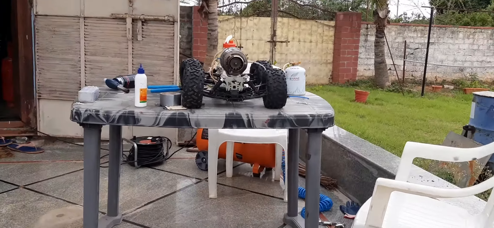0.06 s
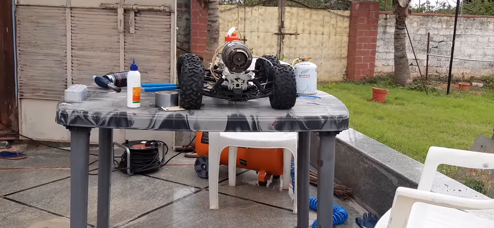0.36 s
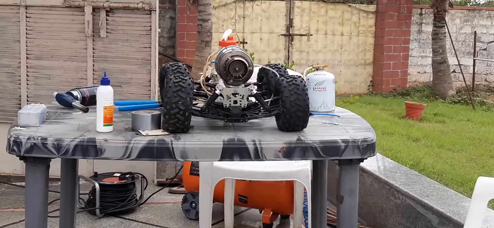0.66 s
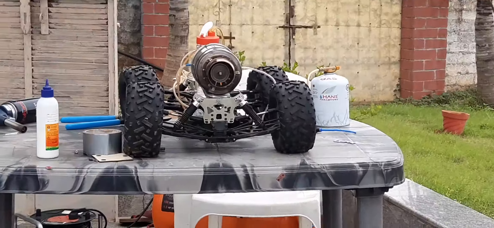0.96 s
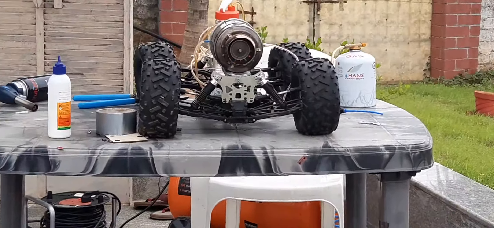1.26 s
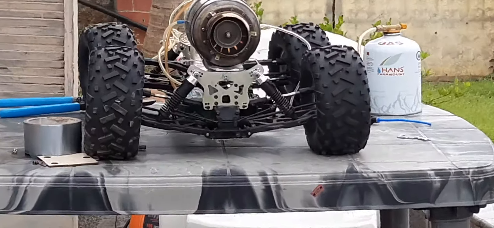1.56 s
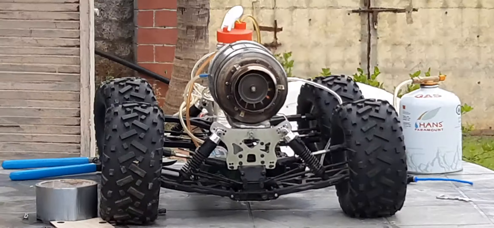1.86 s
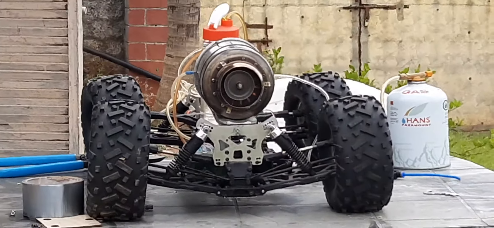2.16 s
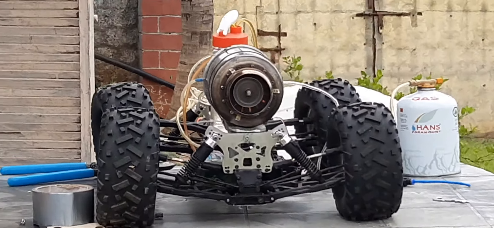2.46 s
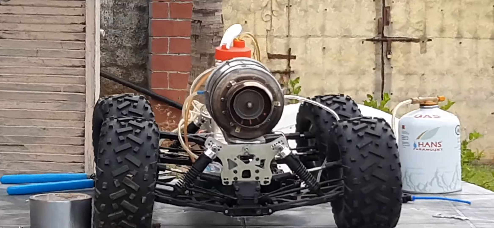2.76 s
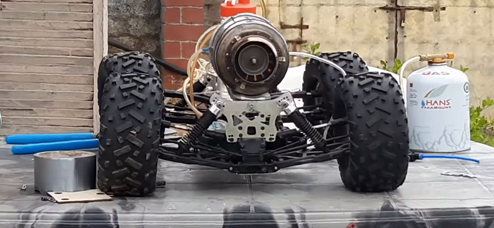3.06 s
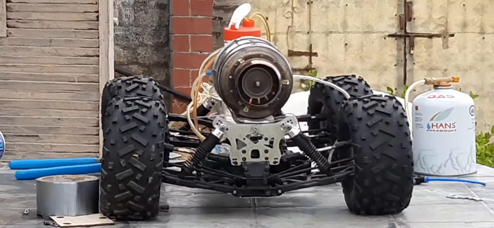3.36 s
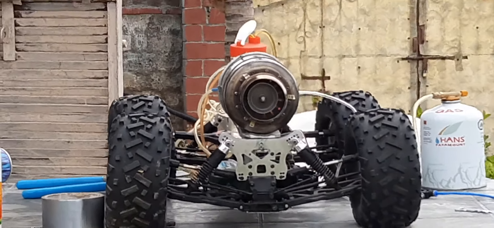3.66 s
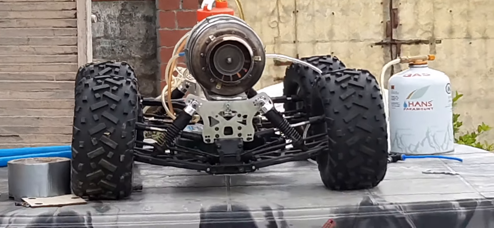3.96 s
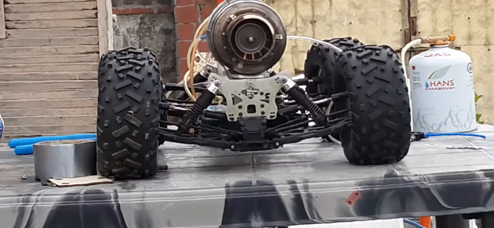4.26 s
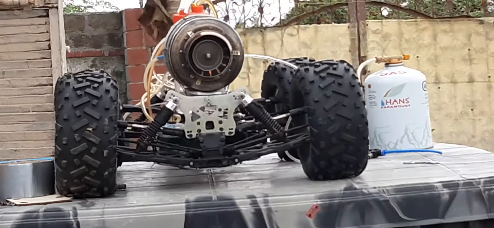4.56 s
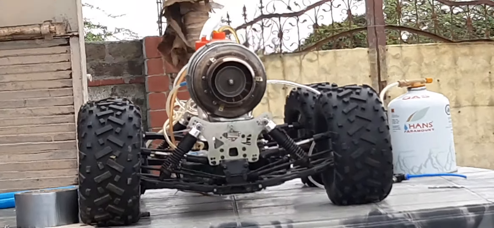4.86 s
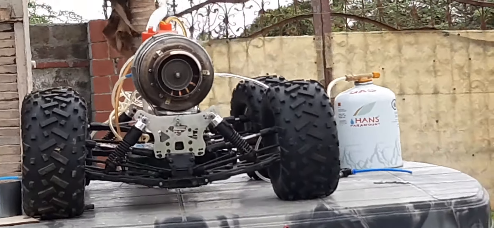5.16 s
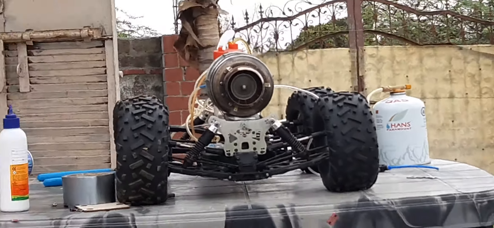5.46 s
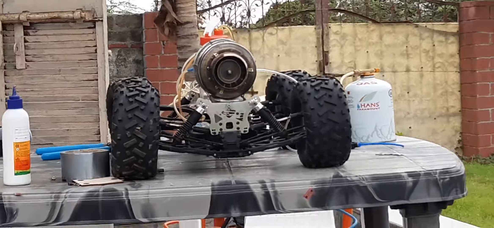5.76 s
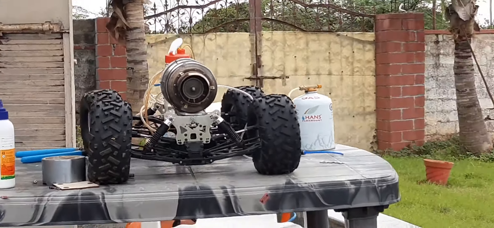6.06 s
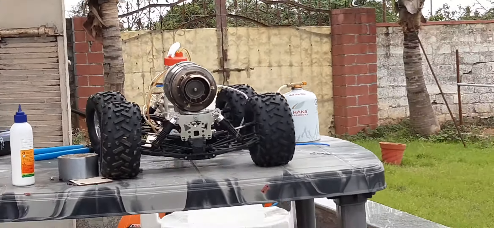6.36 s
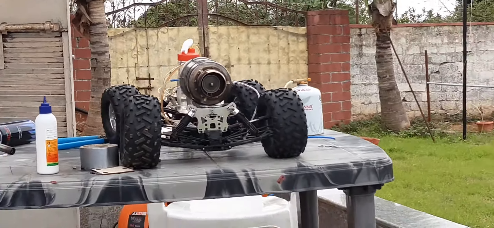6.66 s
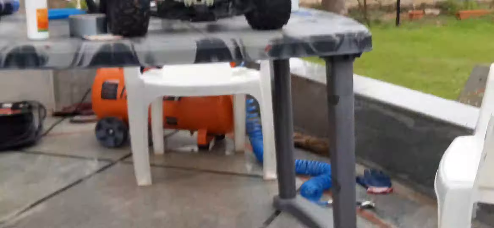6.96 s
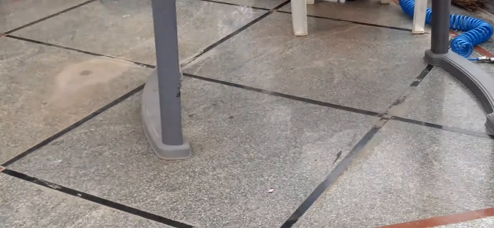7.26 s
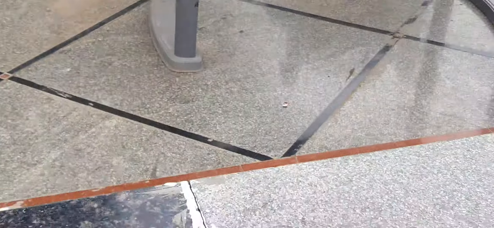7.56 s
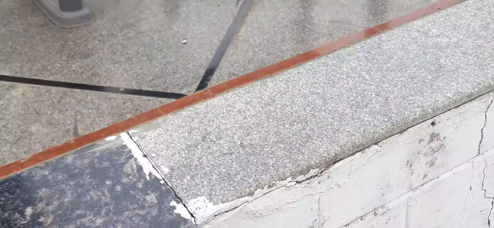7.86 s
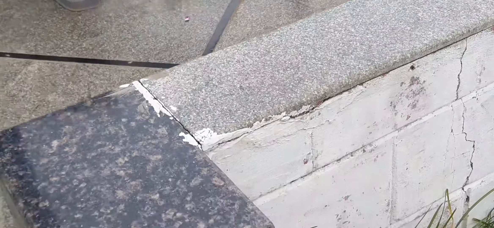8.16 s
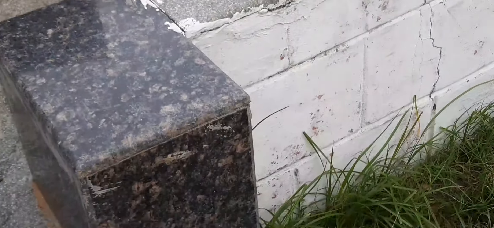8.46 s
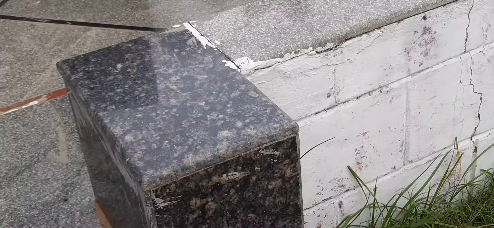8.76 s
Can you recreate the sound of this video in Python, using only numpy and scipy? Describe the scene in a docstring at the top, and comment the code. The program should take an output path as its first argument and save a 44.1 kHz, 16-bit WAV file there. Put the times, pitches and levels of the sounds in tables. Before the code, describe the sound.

Steady rushing roar and sharp hiss of a model jet engine, its thin whine creeping upward, with gusts thumping on the microphone.

```python
"""A small turbojet on a model car runs on a garden table and slowly speeds up. Turbulent combustion
roars, the jet hisses as it shears against still air, and thin shaft and bearing whines rise with the
rotor. The engine radiates a different spectrum each way, so its colour changes as a hand-held phone
comes close, stays level with it, then points down at the paving beside it. The yard adds weak
reflections, and while the phone is close, moving air buffets its two microphones."""
import sys
import numpy as np
from scipy import signal
from scipy.fft import rfft, irfft, next_fast_len
from scipy.io import wavfile
from scipy.ndimage import uniform_filter1d, minimum_filter1d, map_coordinates

SR = 44100
rng = np.random.default_rng(int(sys.argv[2]) if len(sys.argv) > 2 else 0)


def digitize_waveform(pressure):
    """Quantize a signal to 16-bit integers and store it at the path in sys.argv[1].

    Rows of a 2-D input are taken as channels; values are limited to [-1, 1].
    """
    field = np.atleast_2d(pressure).T
    bounded = np.clip(field, -1, 1)
    quanta = np.round(bounded * 32767).astype(np.int16)
    wavfile.write(sys.argv[1], SR, quanta)


N = 388080


def amp(db):
    """Amplitude ratio of a level in decibels."""
    return 10 ** (np.asarray(db) / 20)

def unit(x):
    """Normalisation to an rms of 1."""
    return x / np.sqrt(np.mean(x ** 2) + 1e-20)

def along(points, hz):
    """Interpolation of (Hz, value) points on a logarithmic frequency axis."""
    knots_hz, values = np.transpose(points)
    return np.interp(np.log(hz + 1), np.log(knots_hz + 1), values)

def curves(rows):
    """Linear interpolation in time: one value per sample for each column after the first."""
    times, *columns = np.transpose(rows)
    return [np.interp(np.arange(N) / SR, times, column) for column in columns]

def wobble(rate):
    """Smooth random fluctuation: a spline through `rate` Gaussian knots a second."""
    knots = rng.standard_normal(int(N * rate / SR) + 4)
    return map_coordinates(knots, [np.arange(N) * rate / SR])

def filtered(x, response):
    """Linear filtering: the spectrum is multiplied by a frequency response."""
    size = next_fast_len(N + SR // 4)
    return irfft(rfft(x, size) * response(np.fft.rfftfreq(size, 1 / SR)), size)[..., :N]


# Eddy pressure on a microphone. Each row: frequency in Hz, relative spectral level in dB.
BUFFET_SPECTRUM = [(15, -22), (30, -20), (60, -1.5), (105, 1.5), (180, -0.5), (290, 0), (500, -11),
                   (720, -19), (1000, -31), (2000, -48), (5000, -70)]
# Gusts. Each row: start of the hold in seconds, its length in seconds, relative level in dB.
WIND_GUSTS = [(0.64, 0.073, -22), (0.868, 0.13, -26.5), (1.094, 0.27, -26), (1.69, 0.069, -28),
              (1.895, 0.15, -26.5), (2.23, 0.13, -32), (3.214, 0.045, -25), (3.302, 0.16, -26.5),
              (3.485, 0.37, -25.5), (3.9, 0.09, -28), (4.023, 0.17, -25), (4.26, 0.21, -25),
              (4.553, 0.06, -26), (4.84, 0.098, -25), (5.014, 0.22, -26.5), (5.323, 0.122, -28),
              (5.504, 0.35, -29), (5.967, 0.051, -38), (6.345, 0.13, -26), (6.484, 0.12, -26),
              (6.828, 0.091, -26)]
# The draught, strongest near the engine. Each row: time in seconds, level in dB.
DRAUGHT_LEVEL = [(0, -67), (.5, -39), (.7, -36), (3, -34), (3.7, -34), (6.1, -29.5), (7, -34), (7.4, -55),
                 (8.8, -67)]

def wind(gust_db=-2.0, rise_s=0.037, fall_s=0.051, lump_db=3.5, shared=0.27, air_speed=0.93):
    """Turbulent pressure: eddies in gusts and a draught strike each microphone almost independently."""
    t = np.arange(N) / SR
    gusts = 0
    for start, length, db in WIND_GUSTS:
        corners = [start - rise_s, start, start + length, start + length + fall_s]
        gusts += amp(db + gust_db) * np.interp(t, corners, [0, 1, 1, 0])
    draught_db, = curves(DRAUGHT_LEVEL)
    strength = np.hypot(gusts, amp(draught_db))  # powers add
    air = rng.standard_normal((2, N)) + shared * rng.standard_normal(N)
    rumble = unit(filtered(air, lambda hz: amp(along(BUFFET_SPECTRUM, hz / air_speed))))
    lumps = unit(amp(lump_db * np.array([wobble(30), wobble(30)])))
    return rumble * strength * lumps


# Single harder puffs. Each row: time of the crest in seconds, relative level in dB,
# half length in seconds, air speed as a multiple of the usual.
AIR_PUFFS = [(0.897, -19, .009, 0.92), (1.108, -21, 0.011, .65), (1.279, -21, .014, 0.72),
             (1.342, -21, .009, 1), (1.759, -24, .007, 1.1), (1.85, -26, .006, 1), (1.898, -21, .008, 1.3),
             (1.956, -17.5, 0.01, 1.3), (1.993, -18.5, .007, 1.2), (2.262, -19, 0.0055, 1.2),
             (2.299, -19, .007, 1), (3.352, -18, .008, 1.2), (3.497, -21, .011, 1.14),
             (3.534, -22, .01, 1.1), (3.565, -22, .006, 1.3), (3.587, -18, .01, 0.87),
             (3.631, -21, .014, 1), (3.667, -20, .005, 1), (3.694, -17, 0.014, 1.06), (3.731, -20, .009, 1),
             (3.767, -19, .006, 0.64), (3.801, -22, .006, 1.2), (3.915, -19, 0.0085, 1.05),
             (3.973, -19.5, 0.0089, 1.5), (4.044, -20.5, .018, 1.7), (4.075, -18, .008, 1),
             (4.148, -18.5, .006, .9), (4.175, -22, .009, 1.14), (4.204, -17, .006, 1.16),
             (4.295, -16, 0.018, 1.2), (4.314, -19, .005, 1.4), (4.358, -14.5, 0.0067, 1.1),
             (4.402, -22, 0.0093, 0.89), (4.553, -21, .016, 1.5), (4.638, -20.5, 0.0071, 1.5),
             (4.871, -13, 0.0092, 1.07), (4.934, -20, .005, 1), (4.959, -18, 0.0041, 1.7),
             (4.974, -10.5, 0.0052, 1.3), (5.025, -15, 0.0073, 1.33), (5.246, -19, 0.017, .9),
             (5.341, -17.5, 0.011, 1), (5.386, -14.5, 0.0045, 1.5), (5.407, -18, .009, 1.5),
             (5.426, -14, .004, 0.72), (5.536, -16, 0.0063, 1), (5.551, -19, 0.0033, 1.2),
             (5.603, -22, .008, 1.1), (5.64, -19, .007, 1.4), (5.66, -20, 0.011, 1.06),
             (5.707, -15, .006, 0.85), (5.719, -11.5, 0.011, 2), (5.796, -14, 0.0092, 1.12),
             (5.807, -18, 0.0058, 1.1), (5.819, -14, .005, .9), (5.884, -19, .01, 1.2),
             (5.918, -18, 0.0044, 0.99), (5.98, -17, .007, 1.4), (6.149, -17.5, .004, 1.25),
             (6.21, -15.5, 0.0075, 1.4), (6.585, -21, .01, 0.84)]

def puffs(gain_db=1.8, shared=0.49, size=8192):
    """Eddy frequency scales with flow speed: a slow puff thumps, a fast one rips."""
    t = (np.arange(size) - size // 2) / SR
    hz = np.fft.rfftfreq(size, 1 / SR)
    out = np.zeros((2, N))
    for crest_s, db, half_s, air_speed in AIR_PUFFS:
        noise = rng.standard_normal((3, size))
        air = noise[:2] + shared * noise[2]
        swell = np.exp(-(t / half_s) ** 2)
        eddies = swell * irfft(rfft(air) * amp(along(BUFFET_SPECTRUM, hz / air_speed)))
        start = round(crest_s * SR) - size // 2
        out[:, start:start + size] += amp(db + gain_db) * unit(eddies) * np.sqrt(np.mean(swell ** 2))
    return out


def yard_reflections(x, count=10, echo_db=-14, sway_s=0.00022, mic_offset_s=0.0001954):
    """Comb filtering: table, paving and walls add weak copies whose delays drift as the phone moves."""
    n = np.arange(N)
    bright = filtered(x, lambda hz: hz ** 2 / (hz ** 2 + 850 ** 2))  # long waves bend round surfaces
    out = x.copy()
    for delay_s, slant in zip(rng.uniform(.003, .024, count), rng.uniform(-1.076, 1, count)):
        path_s = delay_s + sway_s * wobble(1.2)
        for mic, side in enumerate((-1, 1)):
            arrival_s = path_s + side * slant * mic_offset_s
            out[mic] += amp(echo_db) * np.interp(n - SR * arrival_s, n, bright[mic])
    return out


# Likeness of the engine's sound at the two microphones. Each row: frequency in Hz, coherence, 0 to 1.
MIC_COHERENCE = [(150, 0.9), (400, 0.7), (800, 0.9), (1100, 0.95), (1400, 0.72), (1800, 0.56), (2600, 0.58),
                 (4200, 0.56), (8000, 0.25), (14000, 0.5)]
# Level difference. Each row: frequency in Hz, left minus right in dB.
MIC_BALANCE = [(300, -0.5), (1100, 1), (2200, 0.5), (4500, -2.2), (6000, -0.94), (13000, -1.7)]
# Sound reaches the left microphone first. Each row: frequency in Hz, phase lead in radians.
MIC_PHASE_LEAD = [(0, -0.5), (1050, 0.77), (1650, 2), (2100, 5), (3000, 6.5), (4000, 10), (7100, 18.5),
                  (16000, 45)]

def engine_noise(colour_db, above_hz):
    """Partial coherence: noise at two spaced microphones, normalised by its power above `above_hz`."""
    size = next_fast_len(N)
    hz = np.fft.rfftfreq(size, 1 / SR)
    left, independent = rfft(rng.standard_normal((2, size)))
    coherence = np.clip(along(MIC_COHERENCE, hz), 0, 1)
    lag = np.exp(-1j * np.interp(hz, *np.transpose(MIC_PHASE_LEAD)))
    right = lag * (coherence * left + np.sqrt(1 - coherence ** 2) * independent)
    gain = amp(colour_db(hz))
    gain /= np.sqrt(np.mean(gain ** 2 * (hz > above_hz)))
    balance = amp(along(MIC_BALANCE, hz) * np.array([[.5], [-.5]]))
    return irfft(np.array([left, right]) * gain * balance, size)[:, :N]


# The phone's path. Each row: time in seconds, place (0 above the engine, 1 level with it,
# 2 down at the side, 3 over the garden wall).
PHONE_PLACE = [(0, 0), (3, 0), (4.02, 0.33), (4.35, 1), (6.1, 1), (6.7, 1.2), (7.3, 2), (7.9, 2),
               (8.12, 2.5), (8.5, 3.5), (8.8, 3)]

def directional_noise(spectra, resonances, above_hz):
    """Directivity: each place receives its own spectrum, blended at equal power as the phone moves."""
    place = np.clip(curves(PHONE_PLACE)[0], 0, len(spectra) - 1)
    out = 0
    for k, spectrum in enumerate(spectra):
        def colour_db(hz):
            peaks_db = sum(lift_db[k] * np.exp(-((hz - centre) / width) ** 2)
                           for centre, width, *lift_db in resonances)
            return along(spectrum, hz) + peaks_db
        share = np.clip(1 - abs(place - k), 0, 1)
        out += np.sqrt(share) * engine_noise(colour_db, above_hz)
    return out

def fading_tone(hz, width_hz, steady=0):
    """Scattering by eddies: a steady part plus a random part that differs at each microphone."""
    fading = np.array([steady + wobble(width_hz) + 1j * wobble(width_hz) for _ in range(2)])
    lead = np.interp(hz, *np.transpose(MIC_PHASE_LEAD)) * np.array([[1], [0]])
    phase = lead + 2 * np.pi * np.cumsum(hz) / SR
    return unit(np.real(fading * np.exp(1j * phase)))


# Rotor speed. Each row: time in seconds, turns per second.
SHAFT_SPEED = [(0, 1343), (.5, 1344), (1.1, 1341), (1.5, 1348), (2, 1358), (3, 1383), (4, 1409),
               (4.8, 1416), (6, 1448), (7.1, 1474), (7.7, 1479), (8.4, 1477), (8.8, 1483)]
# Shaft harmonics. Each row: multiple of shaft speed, width in Hz, relative dB at places 0 to 3.
SHAFT_HARMONICS = [(4, 30, -22, -24, -23, -29), (6, 22, -35, -32, -33, -31), (10, 18, -34, -33, -31, -26.5)]
# The phone crosses the bearing's narrow beams. Each row: time in seconds, relative level in dB.
BEARING_LEVEL = [(0, -26), (1, -35), (1.7, -24), (2.3, -26.5), (3.4, -27), (4.5, -21.5), (5.1, -27),
                 (6.3, -22), (6.9, -23), (7.4, -17.5), (7.8, -18), (8.2, -29), (8.8, -28)]
# A breathy whistle, loudest on the engine's axis. Each row: time in seconds, relative level in dB.
WHISTLE_LEVEL = [(0, -34), (2, -38), (3, -15), (4.3, -9.5), (4.65, -10), (4.85, -17), (5.15, -15),
                 (5.7, -15), (6.3, -20), (6.9, -19), (7.6, -19), (8.8, -30)]
# The tailpipe rings sideways, its colour shifting with the angle.
# Each row: time in seconds, relative level in dB, frequency in Hz.
TAILPIPE_RING = [(0, -32, 1947), (6.9, -30, 1913), (7.15, -22, 1890), (7.4, -14, 1900), (7.8, -13, 1948),
                 (8.35, -17, 1990), (8.5, -9, 2023), (8.8, -9.5, 2055)]

def whines(gain_db=5.0, bearing_order=7.668, whistle_order=5.137, intake_hz=4860, intake_db=-23):
    """Rotor orders: shaft, bearing and whistle tones rise with speed; intake and tailpipe tones do not."""
    speed, = curves(SHAFT_SPEED)
    place, = curves(PHONE_PLACE)
    hiss_db, = curves(HISS_LOUDNESS)  # all the tones follow the level of the jet hiss
    bearing_db, = curves(BEARING_LEVEL)
    whistle_db, = curves(WHISTLE_LEVEL)
    ring_db, ring_hz = curves(TAILPIPE_RING)
    shaft = 0
    for order, width_hz, *place_db in SHAFT_HARMONICS:
        harmonic_db = np.interp(place, range(len(place_db)), place_db) + 2.5 * wobble(2.4)
        shaft += amp(harmonic_db) * fading_tone(order * speed, width_hz, steady=1.0)
    bearing = amp(bearing_db) * fading_tone(bearing_order * speed, width_hz=35, steady=1.4)
    flutter = unit(amp(2.5 * wobble(22)))
    whistle_hz = whistle_order * speed + 35 * wobble(250)
    whistle = amp(whistle_db) * flutter * fading_tone(whistle_hz, width_hz=130)
    intake_fade = unit(amp(4.0 * wobble(8.4)))
    intake = amp(intake_db) * intake_fade * fading_tone(np.full(N, intake_hz), width_hz=45)
    ring = amp(ring_db) * fading_tone(ring_hz, width_hz=210)
    return amp(hiss_db + gain_db) * (shaft + bearing + whistle + intake + ring)


def patchy_hiss(x, depth_db=1.5):
    """Random amplitude modulation: narrow bands of the hiss flicker independently."""
    spectra = signal.stft(x, nperseg=512)[2]
    flicker = rng.standard_normal(spectra.shape[1:])
    flicker = uniform_filter1d(flicker, size=4, axis=0)  # across frequency
    flicker = uniform_filter1d(flicker, size=7, axis=1)  # across time
    gain = unit(amp(depth_db * unit(flicker)))
    return signal.istft(spectra * gain, nperseg=512)[1][:, :N]


# The hiss at places 0 to 3, a table each. Each row: frequency in Hz, relative spectral level in dB.
HISS_FROM_ABOVE = [(1940, -27), (3300, -2.5), (3640, -0.5), (3950, 5), (4500, 4.5), (5040, 3.5), (5820, 4),
                   (6900, 4), (7320, -1), (8340, -9.5), (10100, -5.5), (11700, -0.5), (12700, -3.5),
                   (13900, -3.5), (15700, -11)]
HISS_ON_AXIS = [(1940, -14), (3300, -10), (3650, -1.5), (3950, 8.5), (4510, 6.5), (5140, 6), (6300, 2.5),
                (7220, 4.5), (7510, 0), (8120, -6), (10300, -3), (10800, -6), (11800, -2), (14500, -5),
                (15700, -5)]
HISS_AT_SIDE = [(1940, -44), (3300, -6), (3520, -3.5), (4150, 6), (5040, 3.5), (6170, 3), (7360, 1.5),
                (8390, -10), (9130, -7.5), (10500, -4.5), (11200, -4), (12300, -2.5), (13400, -1.5),
                (15700, -10)]
HISS_AT_WALL = [(1940, -34), (3300, -1), (3710, 2), (4200, 8.5), (4630, 4.5), (5110, 2), (5670, 0.5),
                (7400, 4.5), (8450, -7), (10700, -5), (13200, -1.5), (15100, -5), (15700, -3)]
# Narrow resonances. Each row: centre in Hz, half width in Hz, lift in dB at places 0 to 3.
HISS_RESONANCES = [(3890, 80, 3.5, 0.5, 0.3, 0.3), (4220, 110, 3, 0.2, 0.2, 0.2),
                   (4510, 52, 2, 2.2, 0.3, 0.3), (4860, 40, 3.5, 0.3, 1.2, 0.3),
                   (5240, 40, 3.5, 0.3, 0.3, 0.3)]
# The hiss reaching the phone. Each row: time in seconds, relative level in dB.
HISS_LOUDNESS = [(0, -31.5), (.15, -29.5), (.35, -29), (.6, -31.5), (.8, -29), (1.7, -27), (2.2, -28),
                 (2.9, -27.5), (3.3, -28.5), (4.6, -28.5), (4.9, -29.5), (5.15, -28), (5.9, -30.5),
                 (6.7, -27), (7.8, -24.5), (8.3, -26.5), (8.8, -26)]

def jet_hiss(gain_db=3.0, flutter_db=1.01):
    """Turbulent mixing: fast gas shears against still air and radiates broadband noise."""
    level_db, = curves(HISS_LOUDNESS)
    envelope = amp(level_db + gain_db + flutter_db * wobble(70))
    spectra = [HISS_FROM_ABOVE, HISS_ON_AXIS, HISS_AT_SIDE, HISS_AT_WALL]
    return envelope * directional_noise(spectra, HISS_RESONANCES, above_hz=3700)


# A dip in the roar that slides as the phone is lowered.
# Each row: time in seconds, centre in Hz, approximate depth in dB.
NOTCH_PATH = [(5.9, 646, 0), (6.4, 630, 8), (7, 580, 9), (7.5, 550, 2), (8, 585, 7), (8.4, 650, 3),
              (8.8, 683, 2)]

def reflection_notch(x, width_hz=42, crest_offset_hz=135, crest_ratio=0.35):
    """Interference: a reflection weakens one band and strengthens the next one above."""
    hz, t, spectra = signal.stft(x, SR, nperseg=2048)
    times, *columns = np.transpose(NOTCH_PATH)
    centre_hz, depth_db = (np.interp(t, times, column) for column in columns)
    offset_hz = hz[:, None] - centre_hz
    dip = np.exp(-(offset_hz / width_hz) ** 2)
    crest = crest_ratio * np.exp(-((offset_hz - crest_offset_hz) / (2 * width_hz)) ** 2)
    return signal.istft(spectra * amp(depth_db * (crest - dip)), SR, nperseg=2048)[1][:, :N]


# The roar at places 0 to 3, a table each. Each row: frequency in Hz, relative spectral level in dB.
ROAR_FROM_ABOVE = [(35, -31), (90, -15.5), (140, -8), (235, 2.5), (290, 0), (350, -5), (410, -1), (520, -9),
                   (600, -5.5), (800, -6), (940, -11), (1080, -15), (1480, -16.5), (1950, -14.5),
                   (2300, -16), (3000, -21), (3600, -21.5), (5500, -56)]
ROAR_ON_AXIS = [(60, -25), (150, -6.5), (250, 1), (370, -6), (450, -6), (520, -4.5), (600, -6), (680, -7.5),
                (790, -6.5), (900, -12.5), (1020, -22), (1300, -17), (1550, -19.5), (1900, -15),
                (3600, -21.5), (4700, -59), (7900, -120)]
ROAR_AT_SIDE = [(40, -34), (90, -10.5), (140, -9), (230, 1.5), (330, 2), (450, -0.5), (590, -7),
                (680, -3.5), (790, 1.1), (950, -1.5), (1060, -8), (1220, -9), (1550, -16), (1800, -11),
                (1980, -12), (2250, -12.5), (2800, -19), (3600, -16.5), (5500, -72)]
ROAR_AT_WALL = [(40, -34), (85, -11), (130, -10.5), (240, 3.5), (370, 1), (500, -4.5), (660, -8),
                (830, -1.5), (1000, -4.5), (1200, -12), (1600, -13), (2020, -10), (2400, -15.5),
                (3600, -18), (5500, -70)]
# Hollow resonances. Each row: centre in Hz, half width in Hz, lift in dB at places 0 to 3.
ROAR_RESONANCES = [(233, 14, 1.5, 3, 3.5, 3.5), (294, 22, 4.5, 5, 0.23, -2.5), (579, 50, 0.5, 5, 1.5, 1.5),
                   (739, 35, 5, 2, -0.7, 1.5), (797, 27, -0.5, -0.5, -0.5, 3.5), (903, 39, 6, -1, -1, -0.5),
                   (1600, 60, -1, 2.5, 1, -5), (1900, 43, 2.5, 2.5, -2, 4)]
# The roar reaching the phone. Each row: time in seconds, relative level in dB.
ROAR_LOUDNESS = [(0, -29.5), (.55, -29.5), (.9, -28), (1.7, -27.5), (2.8, -28), (3.2, -29), (4.6, -29),
                 (5.3, -29.5), (6.4, -29.5), (6.9, -27), (7.35, -24.5), (8.1, -24.5), (8.4, -25.5),
                 (8.8, -25.5)]

def burner_roar(gain_db=2.0, flutter_db=1.0, waver_db=2.4, waver_below_hz=750):
    """Combustion noise: a turbulent, fluttering flame excites hollow resonances."""
    level_db, = curves(ROAR_LOUDNESS)
    place, = curves(PHONE_PLACE)
    on_axis = np.clip(1 - abs(place - 1), 0, 1)
    spectra = [ROAR_FROM_ABOVE, ROAR_ON_AXIS, ROAR_AT_SIDE, ROAR_AT_WALL]
    burning = reflection_notch(directional_noise(spectra, ROAR_RESONANCES, above_hz=570))
    # The low roar wavers and dips while the phone is level with the engine, where wind buffets it.
    low = filtered(burning, lambda hz: 1 / (1 + (hz / waver_below_hz) ** 4))
    waver = amp(waver_db * on_axis * (wobble(55) - .5))
    envelope = amp(level_db + gain_db + flutter_db * wobble(35))
    return envelope * (burning - low + waver * low)


def scene(engine_db=-1):
    """Superposition: the engine, its reflections and the air on the microphones add."""
    engine = burner_roar() + patchy_hiss(jet_hiss()) + whines()
    return amp(engine_db) * yard_reflections(engine) + wind() + puffs()

def bass_ducking(x, bass_hz=220, knee_db=-20.5, slope=0.4, hold_s=0.012):
    """Automatic gain control: a thump in the bass briefly pulls everything down."""
    hold = round(hold_s * SR)
    bass = filtered(x, lambda hz: 1 / (1 + (hz / bass_hz) ** 4))
    power = abs(uniform_filter1d(np.mean(bass ** 2, axis=0), hold))
    needed = (1 + (power / amp(knee_db) ** 2) ** 2) ** (-slope / 4)
    held = minimum_filter1d(needed, 2 * hold, origin=-hold // 2)
    return x * uniform_filter1d(held, hold)

def record(dry):
    """Compression and band limiting: the phone ducks under thumps, limits peaks, cuts the top treble."""
    ceiling, hold, top_hz = 0.66, round(0.016 * SR), 15750
    ducked = bass_ducking(dry)
    needed = ceiling / np.maximum(abs(ducked).max(axis=0), ceiling)
    gain = uniform_filter1d(minimum_filter1d(needed, 2 * hold), hold)
    return filtered(ducked * gain, lambda hz: hz < top_hz)


dry = scene()
out = record(dry)
digitize_waveform(out)
```